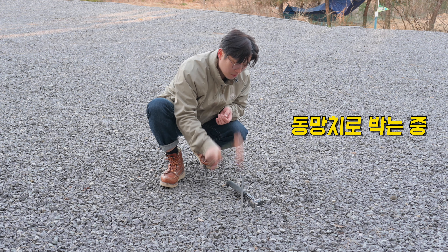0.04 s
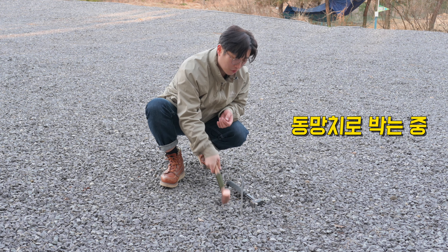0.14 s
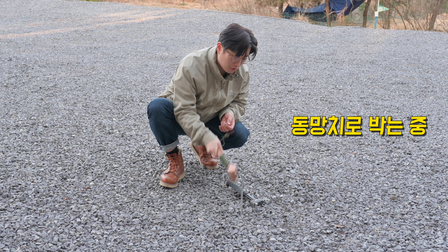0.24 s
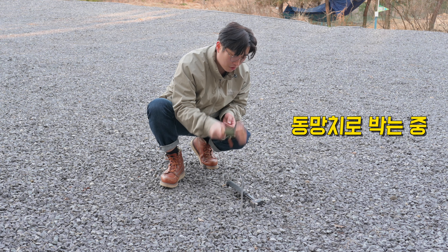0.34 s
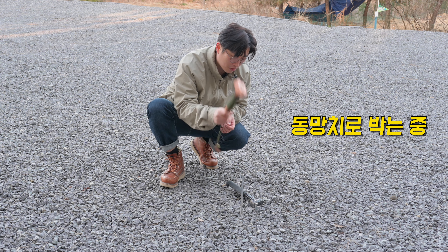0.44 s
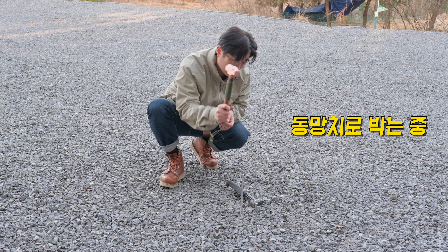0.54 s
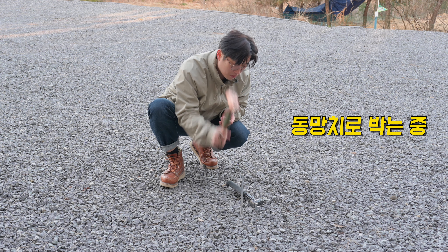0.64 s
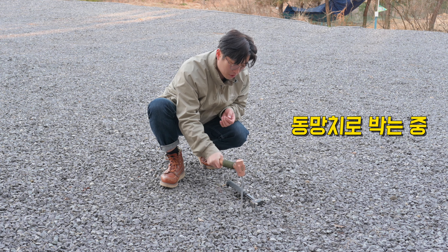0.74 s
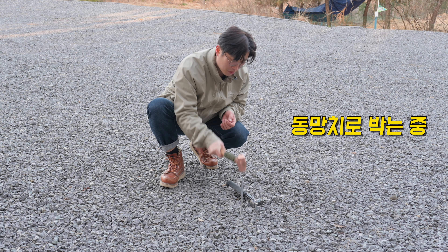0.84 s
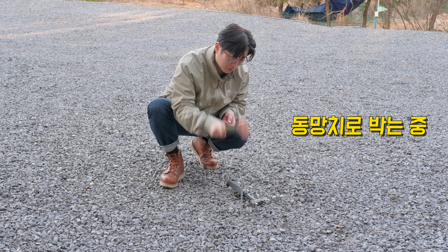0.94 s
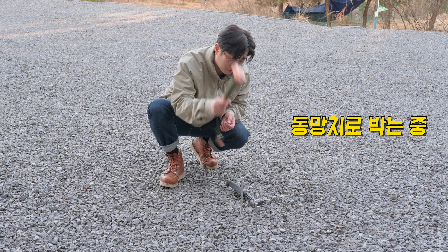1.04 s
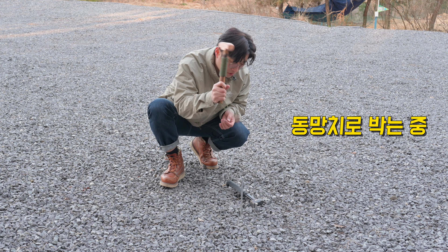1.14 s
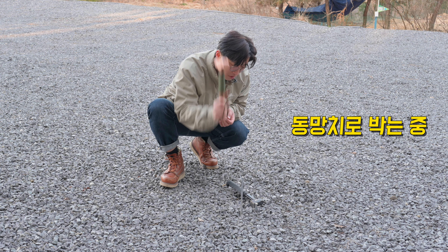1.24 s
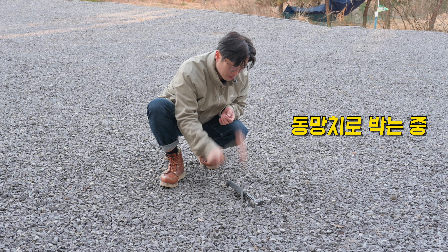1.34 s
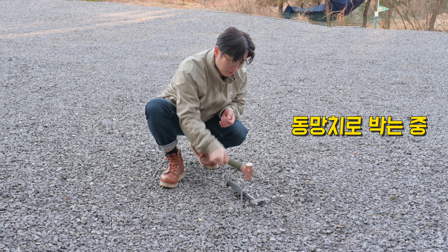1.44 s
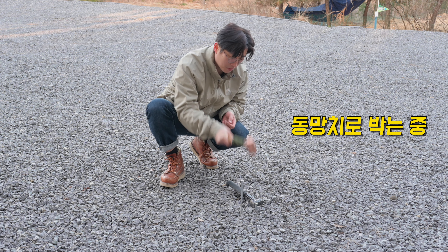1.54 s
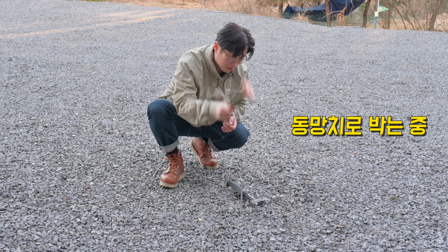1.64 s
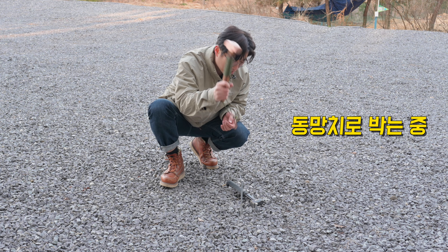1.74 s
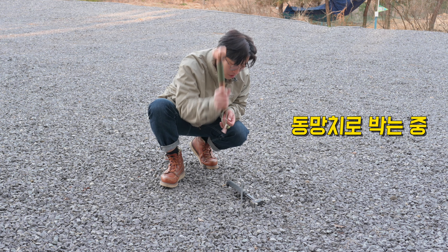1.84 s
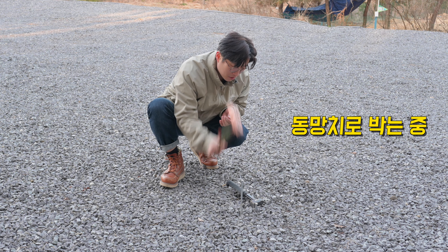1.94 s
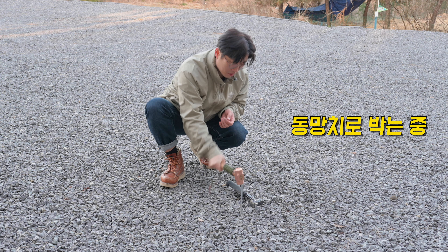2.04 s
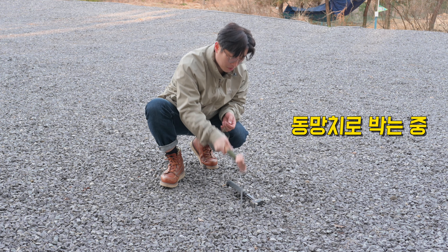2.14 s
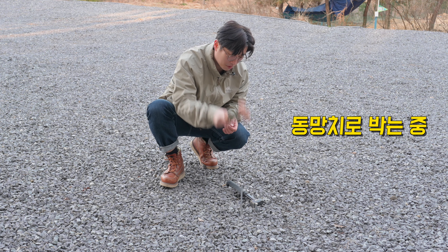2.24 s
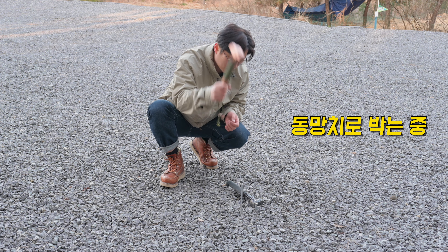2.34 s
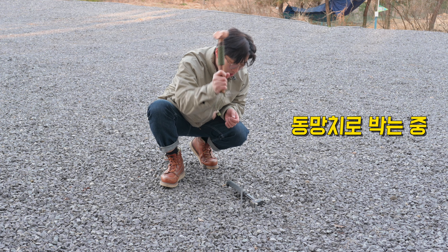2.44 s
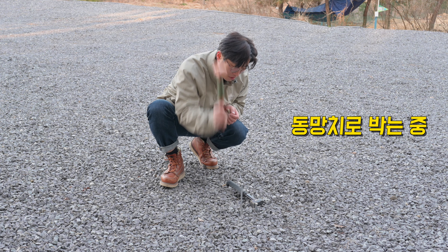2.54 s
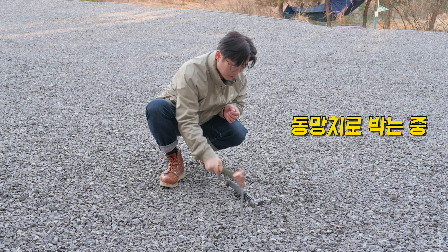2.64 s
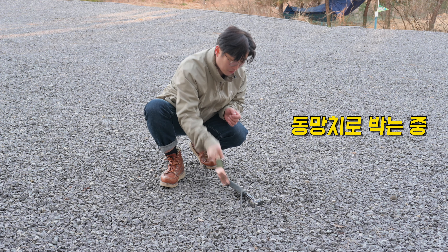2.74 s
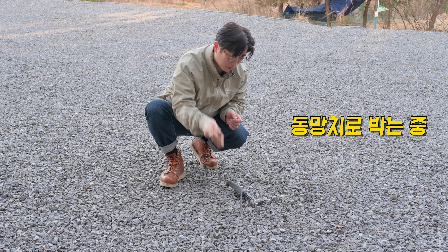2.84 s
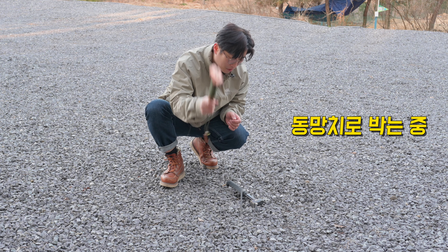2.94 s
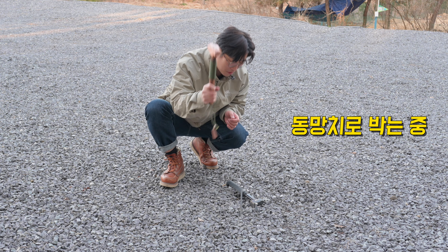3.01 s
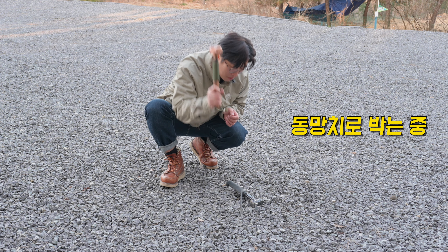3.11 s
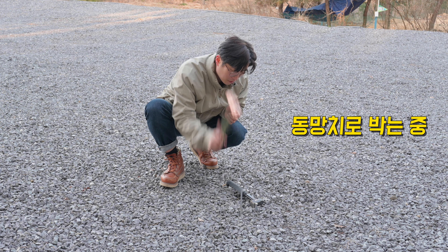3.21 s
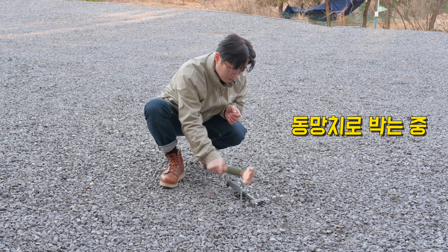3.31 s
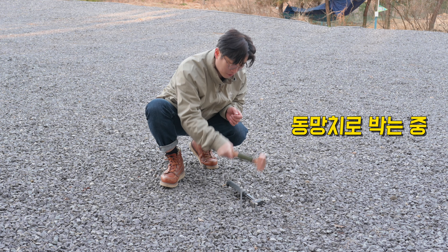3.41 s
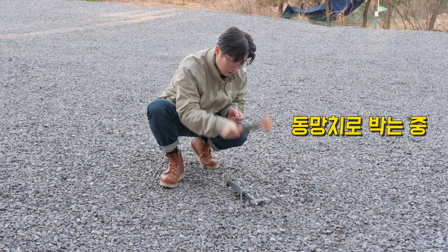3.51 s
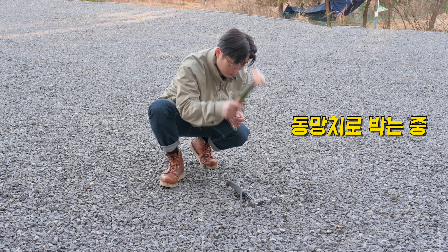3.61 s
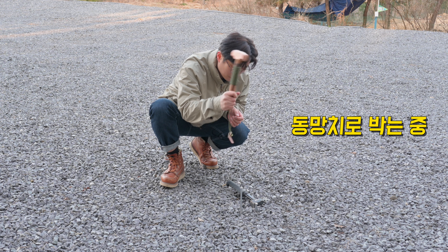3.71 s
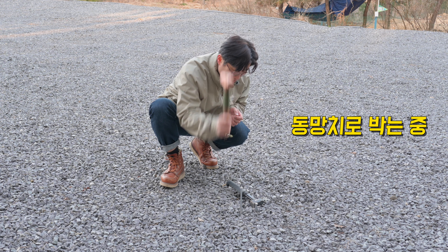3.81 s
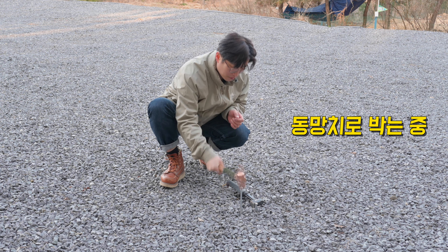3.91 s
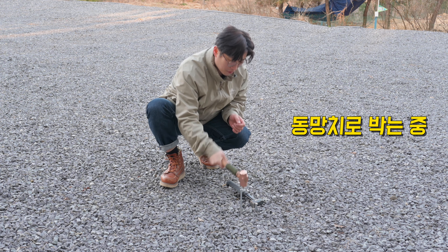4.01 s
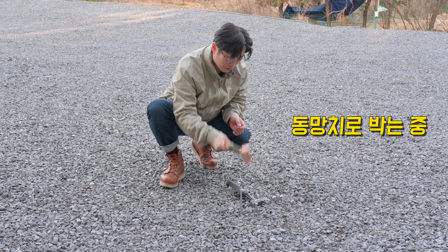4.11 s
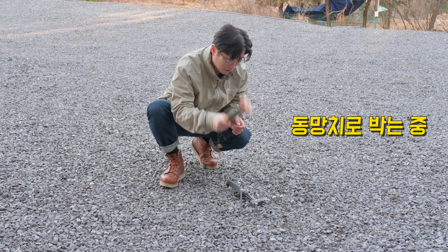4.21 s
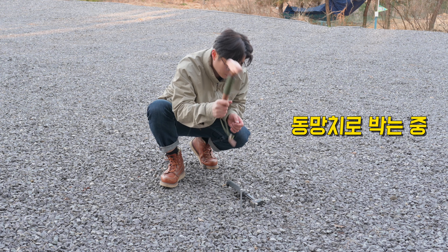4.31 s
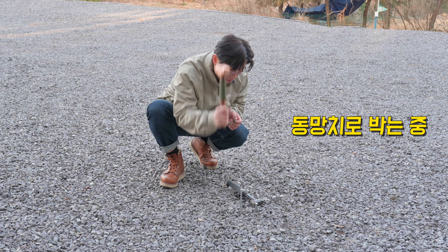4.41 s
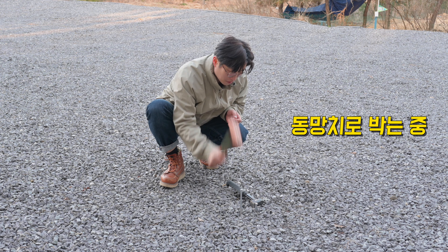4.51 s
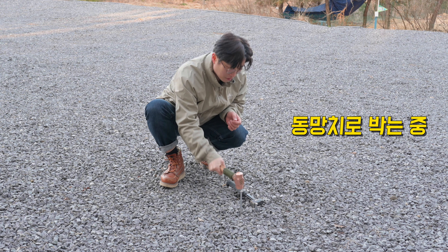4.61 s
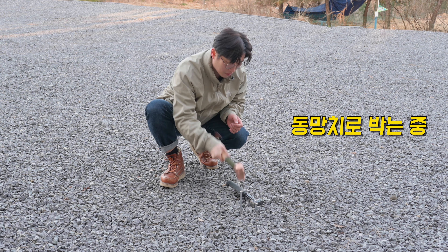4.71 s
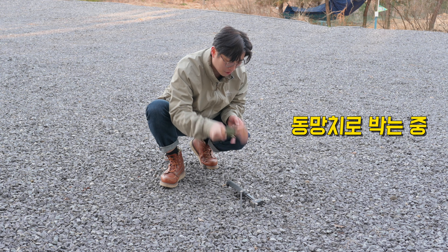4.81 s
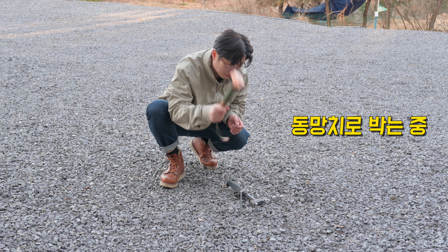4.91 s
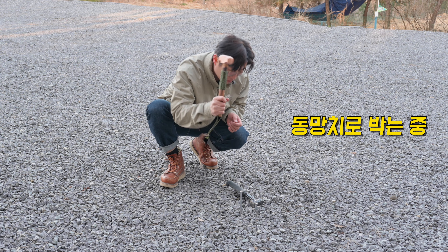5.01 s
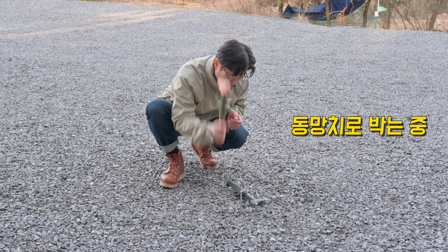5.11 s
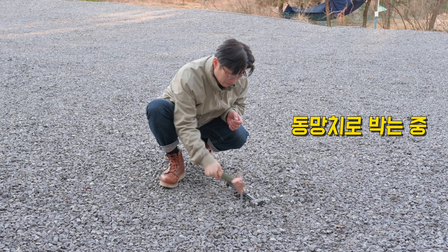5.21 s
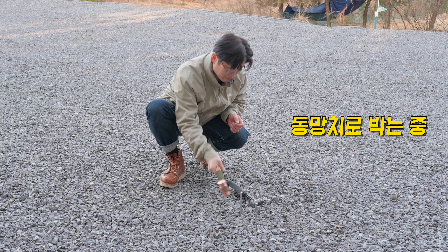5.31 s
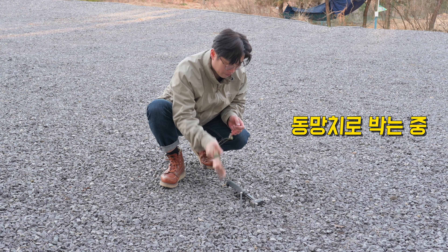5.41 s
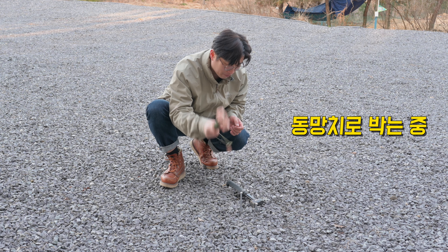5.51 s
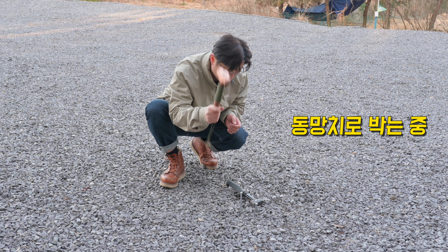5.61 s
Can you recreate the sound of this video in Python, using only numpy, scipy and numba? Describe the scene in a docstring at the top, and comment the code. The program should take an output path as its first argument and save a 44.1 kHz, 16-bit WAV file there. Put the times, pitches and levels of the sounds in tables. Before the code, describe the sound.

Eight hard metallic hammer blows on a peg, evenly spaced, with crunching stones and cloth thumps on the microphone before each swing.

```python
"""A hammer drives a short steel peg into gravel, heard by a small microphone clipped to a jacket.
The cloth pops first, then a light blow bounces twice and small stones tick; eight harder blows follow.
Each blow is a crack, ringing tones, crushed stones and a thud; overload and gain control squash the loud ones.
As the arm swings down before a blow, shaped noise makes the jacket rustle, thump and scrape, with more pops.
Dull knocks fall between the later blows, and thin gliding tones whistle faintly far off."""
import sys
import numpy as np
from scipy import signal
from scipy.fft import rfft, irfft, next_fast_len
from scipy.io import wavfile
from scipy.ndimage import uniform_filter1d
from numba import njit

SR = 44100
rng = np.random.default_rng(int(sys.argv[2]) if len(sys.argv) > 2 else 0)


def wav_record(signal):
    """Record a signal, one row per channel, as 16-bit PCM in the file named by sys.argv[1]."""
    frames = np.transpose(np.atleast_2d(signal))
    bounded = np.clip(frames, -1, 1)
    # unit amplitude maps onto the largest positive 16-bit level
    quanta = np.round(bounded * 32767).astype(np.int16)
    wavfile.write(sys.argv[1], SR, quanta)


N = 249371


def hammer():
    """Steel cracks on steel, the modes ring and stones crush; the treble reaches the two ports unequally."""
    # Hammer blows and rebounds. Each row: start in seconds, strength in dB, then levels in dB or pitches:
    # crack in dB, crack in Hz, low modes in dB, treble in dB, head ring in dB, ground thud in dB,
    # and a factor on the ring length.
    blows = [(.1229, -14, 3.5, 2800, -21, 5.5, 13, -21, 0.66),
             (0.1319, -28.5, -14, 2700, 8, 17.5, 1, 6, 0.77),
             (.1782, -21.5, -27, 2850, -23, 20, 20, 8, 0.38), (0.7802, -8.5, 5.5, 2715, -5, 6, 4, 8.5, 0.9),
             (1.4272, -8.5, -0.5, 2620, -9, 8.5, 9, 3.5, 0.98),
             (2.0543, -8.5, 2.5, 2630, 2.5, 8, 4, 11, 1.14),
             (2.7100, -5.5, -2.5, 2610, 1.8, 2, -1, -8, 0.7), (3.342, -9, 4.5, 2580, -1, 0.5, 8, -13, 0.91),
             (3.9822, -6, 4, 2540, 7.5, -0.5, 8, -5, 0.72), (4.6232, -5, -0.5, 2640, 6.5, 0, 0, 7.5, 0.75),
             (5.2808, -12, 5.5, 2550, 5, 9, 12, 2, 0.86)]
    # Ringing tones (modes) of peg and hammer head; the ground damps the peg, the head rings on thinly.
    # Each row: pitch in Hz, level in dB before the blow's own changes, seconds to fall 60 dB before its factor.
    steel_modes = [(830, -9, .03), (1080, -9, .03), (1720, -4, .025), (2330, -4, .025), (2890, -4, .03),
                   (3080, -1.5, .035), (3500, -8, .02), (4750, -14, .035), (5830, -15, .03),
                   (6200, -17, .03), (7130, -17, .025), (10310, -18, .025), (12970, -21, .02),
                   (6745, -38, .07), (8690, -37, .08), (9520, -28, .08), (9440, -33, .08),
                   (11850, -37, .06), (14530, -25, .1), (14590, -38, .17)]
    # Colour of the stones crushed under the peg. Each row: frequency in Hz, level in dB per Hz.
    crunch_curve = [(200, -13), (600, 3), (1500, 0.5), (3000, 4), (5000, -1.5), (9000, -6), (15000, -11)]
    head_t60_s = .055  # longer rings belong to the head
    grip_s, crunch_s = 0.0076, 0.0052  # the ground stops the peg; the stones stop moving (times ring)

    out = np.zeros((2, N))
    t = np.arange(int(.2 * SR)) / SR
    hz, db, t60 = np.array(steel_modes).T[:, :, None]
    is_head = t60 > head_t60_s
    for s, strength_db, crack_db, crack_hz, low_db, treble_db, head_db, thud_db, ring in blows:
        level_chance, pitch_chance, side_chance = rng.standard_normal((3, len(steel_modes), 1))
        crunch_noise, side_noise = rng.standard_normal((2, len(t)))
        crack = -undb(13 + crack_db) * np.sin(2 * np.pi * crack_hz * t) * fade(t, 0.0031)

        mode_db = np.select([is_head, hz < 2000, hz > 4000], [head_db, low_db, treble_db])
        mode_db = db + mode_db + 2.2 * level_chance
        # the ground grips the peg differently each time, which detunes the damped modes most
        drift = 1 + .0002 / t60 * pitch_chance
        modes = -undb(mode_db) * np.sin(2 * np.pi * hz * drift * t) * fade(t, t60 * ring)
        grip = np.exp(-(t / (grip_s * ring)) ** 2)
        modes = modes * np.where(is_head, 1, grip)

        # the stones give way just after the steel meets, then stop short
        giving = (1 - np.exp(-(t / .0007) ** 2)) * np.exp(-(t / (crunch_s * ring)) ** 1.5)
        crunch = undb(0.5 + treble_db / 2) * unit(colour(crunch_noise, crunch_curve)) * giving
        thud = -undb(-13.0 + thud_db) * np.sin(2 * np.pi * 420 * t) * fade(t, 0.02)

        # the part that is opposite in the two channels, stronger for high modes
        side = 0.063 * (modes * np.sign(side_chance) * np.minimum(hz / 12000, 1)).sum(0)
        side += undb(-19) * unit(band(side_noise, 11000., 9000.)) * fade(t, .02)
        mid = crack + modes.sum(0) + crunch + thud
        add(out, s, undb(strength_db) * np.array([mid + side, mid - side]))
    return out


def ticks():
    """Stones and grit tap each other: tiny, bright bursts of noise."""
    # Each row: start in seconds, peak in dB, centre pitch in Hz, width in octaves.
    stone_ticks = [(0.2182, -33, 6940, 1.1), (0.2408, -38, 6040, 1.2), (0.2777, -35, 5430, .8),
                   (0.2976, -28, 4470, 0.94), (0.3423, -29.5, 5500, 0.84), (0.3562, -24.5, 5400, 1.1),
                   (0.3615, -27, 5000, .9), (0.3746, -22.5, 4100, .8), (0.3973, -23, 4270, 1.3),
                   (0.3999, -15.5, 8600, 2.5), (0.432, -32, 4800, 1.2), (0.4706, -27.5, 5570, 1.9),
                   (0.4916, -27.5, 4540, 1.1), (0.5208, -26, 6250, 1.2), (0.5413, -26.5, 4970, 0.71),
                   (0.9051, -33, 4060, 1.3), (1.5537, -36, 6410, 0.73), (1.771, -30, 7000, 1.6),
                   (2.0107, -44, 5920, 1.4), (2.115, -28, 8020, 1.2), (2.167, -33, 5800, 0.98),
                   (2.2543, -26, 4900, 0.92), (2.6476, -28, 4410, 1.2), (3.281, -25, 4760, 2.5),
                   (3.369, -26, 7010, 1), (3.721, -39, 4500, 1.1), (3.729, -31.5, 10000, 1.2),
                   (4.1075, -29, 3840, 1.4), (4.401, -38, 3900, .7), (4.796, -27.5, 3600, 1.4),
                   (4.826, -39, 6500, 1.1), (5.4706, -30.5, 4960, 1.4)]
    return bursts(stone_ticks, 0.0077)


def knocks():
    """The peg and the hand settle: dull bursts of noise that last a little longer."""
    # Each row: start in seconds, peak in dB, centre pitch in Hz, width in octaves.
    dull_knocks = [(0.8377, -23, 895, 2.2), (0.9938, -29.5, 1010, 1.6), (1.4635, -26, 550, 0.84),
                   (1.5122, -36, 400, .8), (1.9205, -34, 1420, 1.1), (2.0961, -21, 570, 1.4),
                   (2.8168, -39, 770, 0.82), (2.8381, -29, 715, 1.45), (2.9838, -34, 880, 1.6),
                   (3.1178, -32.5, 685, 0.78), (3.379, -32, 900, 1.2), (3.477, -32.5, 480, 0.32),
                   (3.9285, -26.5, 1480, 0.39), (4.0454, -23, 650, 1.5), (4.069, -35.5, 398, 1.2),
                   (4.2651, -28, 890, 2.05), (4.5475, -31.5, 1180, 0.49), (4.7367, -34, 980, 1.2),
                   (5.2162, -20, 1630, .95)]
    return bursts(dull_knocks, 0.02)


def bursts(table, t60):
    """Short noise bursts, each filling a band around its own pitch and falling 60 dB in t60 seconds."""
    out = np.zeros(N)
    t = np.arange(int(.06 * SR)) / SR
    envelope = fade(t, t60) * (1 - np.exp(-t / 0.00024))
    for s, db, hz, octaves in table:
        burst = colour(rng.standard_normal(len(t)), hump(hz, octaves)) * envelope
        add(out, s, undb(db) * burst / np.abs(burst).max())
    return out


def pops():
    """Cloth slaps the microphone: pressure drops suddenly and swings back, then a dull flutter dies away."""
    # Each row: start in seconds, level of the whole pop in dB, pitch in Hz, flutter in dB against the pop.
    cloth_pops = [(0.0051, -11, 724, -13.5), (0.089, -27, 330, 1), (0.636, -15.5, 410, -10.5),
                  (1.202, -26, 430, -22), (1.3069, -20, 442, -14), (1.3371, -6, 830, -14),
                  (1.9477, -18, 646, -8), (1.9693, -7, 706, -14.5), (1.997, -23, 410, -6),
                  (2.0292, -20.5, 660, -13), (2.0478, -18, 850, -25), (2.6085, -1.5, 850, -21.5),
                  (2.6236, -20, 530, -10), (3.22, -21.5, 527, -15), (3.2437, -12.5, 627, -8.5),
                  (4.4967, -22, 730, -21), (4.5101, -23.5, 292, -31), (5.1433, -24.5, 407, -9),
                  (5.2314, -21.5, 650, -8.5)]
    damping, rise_cycles = 0.95, 0.033  # width over pitch; rise in cycles of the pitch
    out = np.zeros(N)
    t = np.arange(int(0.13 * SR)) / SR
    for s, db, hz, flutter_db in cloth_pops:
        envelope = np.exp(-np.pi * damping * hz * t) * (1 - np.exp(-t * hz / rise_cycles))
        swing = -np.cos(2 * np.pi * hz * t) * envelope
        flutter = unit(colour(rng.standard_normal(len(t)), hump(300, 0.75)))
        flutter = flutter * fade(t, 0.033) * (1 - np.exp(-t / 0.0014))
        add(out, s, undb(db) * (swing + undb(flutter_db) * flutter))
    return out


def jacket():
    """Cloth rubs: a dull lumpy body, a fine hiss with fibre crackles, and a low rumble of air."""
    # Colours of the body and the hiss. Each row: frequency in Hz, level in dB per Hz.
    body_curve = [(88, -17), (150, -11.5), (290, 0), (358, -2), (403, -3), (919, -1), (2500, -13),
                  (3250, -41), (5500, -120)]
    hiss_curve = [(1000, -14), (1800, -5.5), (3200, -2.5), (5500, -6), (9000, -9.5), (12600, -14.5),
                  (15200, -18), (15850, -13), (16100, -53)]
    rumble_curve = [(20, -42), (55, -8.5), (110, -2.5), (240, 1.5), (330, -21)]
    body_db, hiss_db = rubbing()
    body_noise, hiss_noise, rumble_noise, fibre_noise = rng.standard_normal((4, N))

    # about 500 fibre clicks a second, at random moments and strengths
    clicks = rng.random(N) < 500 / SR
    fibres = clicks * undb(np.minimum(3 * rng.exponential(size=N), 9)) * fibre_noise

    lumps = undb(1.84 * walk(110))
    body = unit(colour(body_noise * lumps + 1.9 * fibres, body_curve))
    flicker = undb(1.3 * walk(70) + 0.25 * walk(9))
    hiss = unit(colour(hiss_noise * flicker + 2 * fibres, hiss_curve))
    gusts = undb(3 * walk(25))
    rumble = unit(colour(rumble_noise * gusts, rumble_curve))
    return body * undb(body_db) + hiss * undb(hiss_db) + rumble * undb(-62.5)


def rubbing():
    """Levels of body and hiss in dB: rest, a build-up into each downswing, a quick fall."""
    # Downswings of the arm, when the jacket rubs hardest. Each row: time of the peak in seconds,
    # resting level before it in dB, body peak in dB, hiss peak in dB, build-up in seconds.
    swings = [(.045, -52, -30, -36, 0.039), (0.75, -52.5, -45, -43.5, 0.18),
              (1.312, -50.5, -45.5, -43, 0.088), (1.958, -48, -46.5, -45.5, 0.14),
              (2.602, -46.5, -38, -40, 0.048), (3.246, -50.5, -37.5, -38, 0.099),
              (3.942, -50.5, -43, -42, 0.13), (4.566, -50, -45, -46, 0.13), (5.201, -49, -43, -42, 0.11),
              (5.66, -49.5, -43, -50, .05)]
    settle_s, hiss_rest_db = 0.061, -2.5  # fall after a downswing; resting hiss against resting body
    t = np.arange(N) / SR
    s, rest_db, *_ = np.transpose(swings)
    body = np.interp(t, s - .3, rest_db)
    hiss = body + hiss_rest_db
    for at, level_db, body_db, hiss_db, rise_s in swings:
        shape = swell_at(t, at, rise_s, settle_s)
        body = body + (body_db - level_db) * shape
        hiss = hiss + (hiss_db - level_db - hiss_rest_db) * shape
    return body, hiss


def thumps():
    """Air thumps on the microphone: puffs of low noise that swell and sink, each around its own pitch."""
    # Each row: time of the middle in seconds (a puff that would begin before 0 is moved to 0), level in dB,
    # seconds from the middle until it has sunk to about a third, centre pitch in Hz.
    air_thumps = [(0.085, -39, 0.018, 220), (0.362, -68, .03, 180), (0.645, -54, .02, 202),
                  (1.207, -49, .02, 230), (1.31, -41, 0.022, 200), (1.757, -47, 0.075, 110),
                  (1.947, -40, .02, 230), (2.489, -46.5, 0.029, 90), (2.602, -45, .025, 200),
                  (3.229, -42, .03, 230), (3.834, -50.5, .025, 170), (4.356, -53.5, 0.044, 121),
                  (4.502, -43.5, 0.024, 209), (5.05, -56, .03, 80), (5.136, -45.5, 0.027, 199)]
    out = np.zeros(N)
    t = np.arange(-.09, .09, 1 / SR)
    for s, db, length, hz in air_thumps:
        puff = unit(colour(rng.standard_normal(len(t)), hump(hz, 0.77)))
        puff = puff * np.exp(-(t / length) ** 2)
        add(out, max(s + t[0], 0), undb(db) * puff)
    return out


def scrapes():
    """Cloth drags over the microphone: fibres catch and slip in a dense, uneven run of clicks."""
    # Each row: start in seconds, length in seconds, level in dB (rms before the fades),
    # centre pitch in Hz, width in octaves.
    cloth_scrapes = [(0.027, 0.012, -33.5, 2480, 1.83), (0.041, 0.016, -35.5, 3430, 4.8),
                     (0.054, 0.018, -31, 4500, 6.6), (0.076, 0.0089, -36, 1500, 1),
                     (0.906, 0.019, -45, 1800, 2.1), (1.373, 0.01, -44, 1890, 1.6),
                     (1.939, 0.02, -38.5, 870, 1.05), (2.632, 0.0062, -35, 1800, 2.1),
                     (2.655, 0.0089, -31.5, 1770, 1.4), (3.249, .012, -33, 1180, 1.04),
                     (3.259, 0.031, -34, 1740, 2.2), (3.316, 0.028, -33, 2080, 1.7)]
    out = np.zeros(N)
    t = np.arange(int(.04 * SR)) / SR
    for s, length, db, hz, octaves in cloth_scrapes:
        when, strength, sign = rng.random((len(t), 3)).T
        # about 2500 slips a second, a few of them much stronger
        slips = (when < 2500 / SR) * undb(-3.5 * np.log(1 - strength)) * np.sign(sign - .5)
        swell = np.clip(np.minimum(t, length - t) / .0015, 0, 1)
        add(out, s, undb(db) * unit(colour(slips, hump(hz, octaves))) * swell)
    return out


def whistles():
    """Faint thin tones far off that glide, waver in pitch and swell unevenly."""
    # Each row: start in seconds, length in seconds, first pitch in Hz, last pitch in Hz, level in dB.
    far_whistles = [(.735, 0.18, 3620, 3530, -58), (1.6, 0.27, 1380, 1500, -54.5),
                    (2.26, .22, 1760, 1860, -54.5), (3.53, 0.25, 1380, 1300, -53.5)]
    waver_hz, swell_db = 55, 2.5  # typical size of the random wandering
    out, waver, swell = np.zeros(N), walk(150), walk(80)
    for s, length, first_hz, last_hz, db in far_whistles:
        u = np.linspace(0, 1, int(length * SR))
        i = int(s * SR)
        part = slice(i, i + len(u))
        hz = first_hz + (last_hz - first_hz) * u + waver_hz * waver[part]
        tone = np.sin(2 * np.pi * np.cumsum(hz) / SR)
        envelope = undb(db + swell_db * swell[part]) * np.sin(np.pi * u) ** .5
        add(out, s, envelope * tone)
    return out


def undb(db):
    """Turn decibels into a plain factor."""
    return 10 ** (np.asarray(db) / 20)


def unit(x):
    """Scale a signal to an average strength (rms) of 1."""
    return x / np.sqrt(np.mean(x ** 2))


def fade(t, t60):
    """Falls 60 dB in t60 seconds."""
    return np.exp(-np.log(1000) * t / t60)


def swell_at(t, s, rise_s, fall_s):
    """Climbs to 1 at time s and dies away after it."""
    return np.exp(-np.abs(t - s) / np.where(t < s, rise_s, fall_s))


def hump(hz, octaves):
    """A rounded spectrum around hz, 8 dB down at the given number of octaves to either side."""
    return [(hz * 2 ** (k * octaves), -8 * k * k) for k in (-2, -1, -.5, 0, .5, 1, 2)]


def colour(x, points):
    """Shape a signal's spectrum by (Hz, dB) points on a log axis."""
    hz, db = np.transpose(points)
    n = next_fast_len(len(x))
    f = np.maximum(np.arange(n // 2 + 1) * SR / n, 1)
    curve_db = np.interp(np.log(f), np.log(hz), db, left=-60, right=-60)
    return irfft(rfft(x, n) * undb(curve_db), n)[:len(x)]


def band(x, hz, width):
    """Two-pole resonance, gain 1 at the centre; width in Hz."""
    return signal.lfilter(*signal.iirpeak(min(hz, .44 * SR), hz / width, fs=SR), x)


def walk(rate):
    """Random levels held 1 / rate seconds and smoothed twice; spread near 1."""
    k = int(SR / rate)
    steps = np.repeat(rng.standard_normal(N // k + 1), k)
    return 1.43 * uniform_filter1d(uniform_filter1d(steps, k), k)[:N]


def add(track, s, sound):
    """Mix a sound in at time s."""
    i = int(s * SR)
    track[..., i:i + sound.shape[-1]] += sound[..., :N - i]


@njit
def gain_control(x, top, ratio, attack, hold, release, slow_share, slow_release):
    """Follows peaks, holds, lets go fast for one part of the cut and slowly for the rest."""
    gain, fast, slow, wait = np.empty(len(x)), 0., 0., 0.
    for i in range(len(x)):
        # wanted cut, as a natural logarithm
        cut = max(np.log(x[i] / top + 1e-9), 0.) * (1 - 1 / ratio)
        if cut > fast:
            fast, wait = fast + attack * (cut - fast), hold
        elif wait > 0:
            wait -= 1
        else:
            fast -= release * fast
        slow = max(fast, slow * (1 - slow_release))
        gain[i] = np.exp(-(1 - slow_share) * fast - slow_share * slow)
    return gain


def scene():
    """Hammer blows in front, cloth at the microphone, then stones, knocks and far whistles."""
    cloth = jacket() + thumps() + pops() + scrapes()
    # a very faint copy, 150 samples late and opposite in the two channels, widens the cloth slightly
    apart = undb(-50.5) * np.roll(cloth, 150) * np.array([[1], [-1]])
    return hammer() + cloth + apart + ticks() + knocks() + whistles()


def record(dry):
    """Gain control reacts a millisecond late, so the first swings overload; the treble rolls off, then is cut."""
    loudness = np.abs(dry).max(axis=0)
    # times in seconds, turned into samples or into a share per sample
    gain = gain_control(loudness, top=.13, ratio=17.5, attack=1 / (0.0005 * SR), hold=.08 * SR,
                        release=1 / (0.016 * SR), slow_share=0.15, slow_release=1 / (.3 * SR))
    late_gain = np.concatenate([np.ones(int(0.0011 * SR)), gain])[:N]
    wet = dry * late_gain
    ceiling = 0.46  # overload bends the wave smoothly towards this height
    wet = wet / (1 + np.abs(wet / ceiling) ** 8) ** .125
    wet = signal.sosfilt(signal.butter(6, 15600, fs=SR, output="sos"), wet)
    return signal.sosfilt(signal.ellip(8, .2, 70, 16600, fs=SR, output="sos"), wet)


dry = scene()
out = record(dry)
wav_record(out)
```